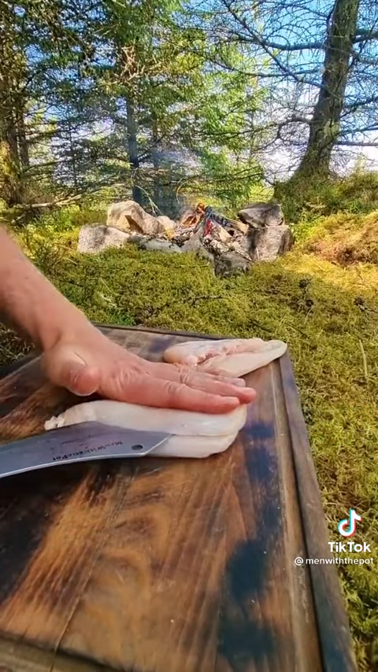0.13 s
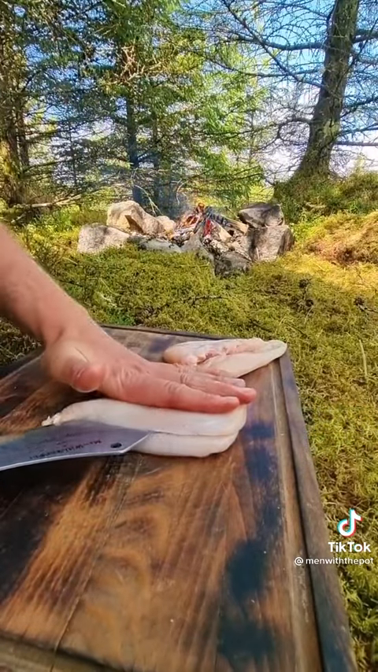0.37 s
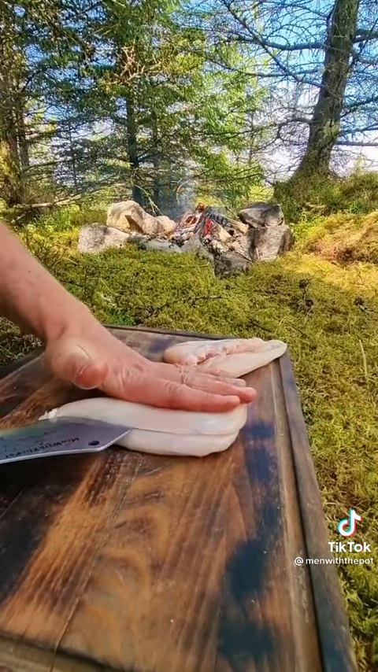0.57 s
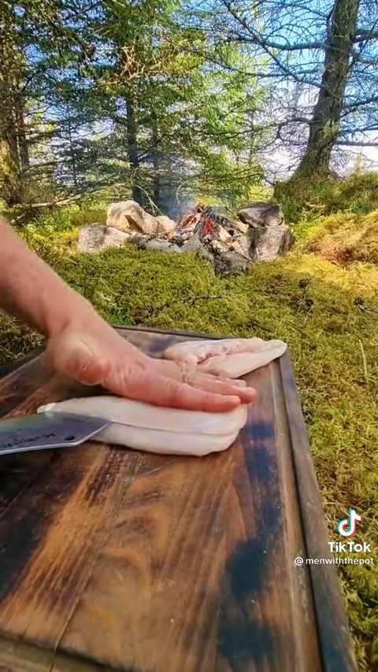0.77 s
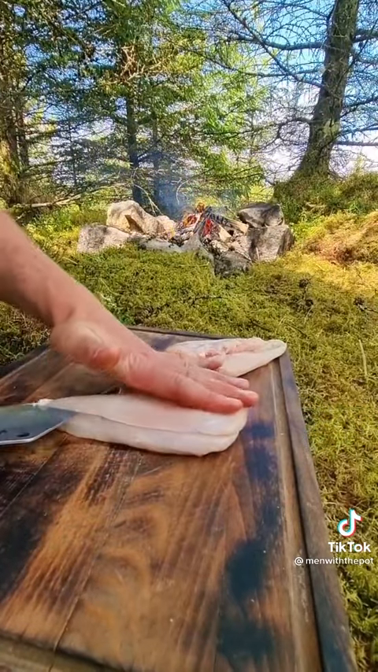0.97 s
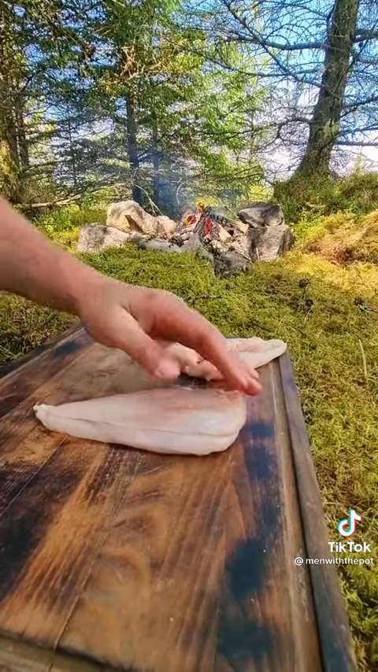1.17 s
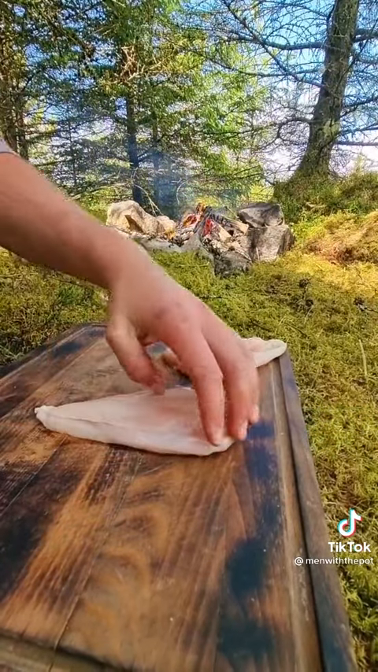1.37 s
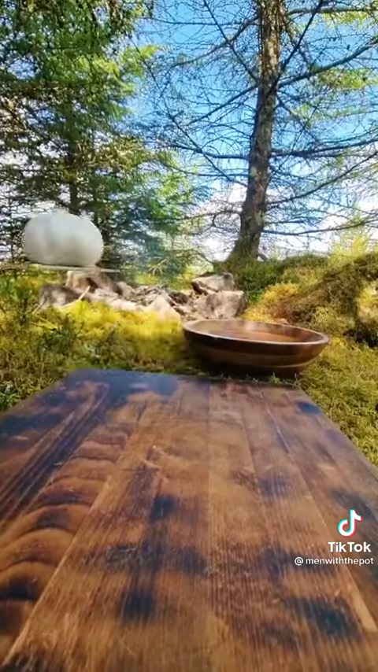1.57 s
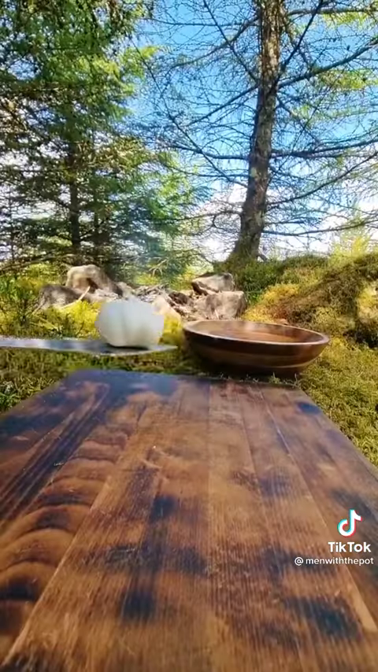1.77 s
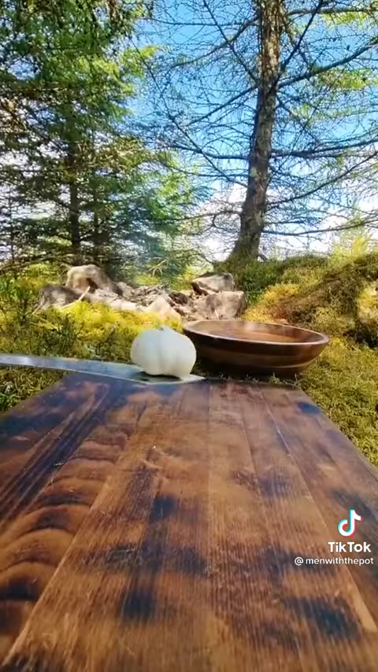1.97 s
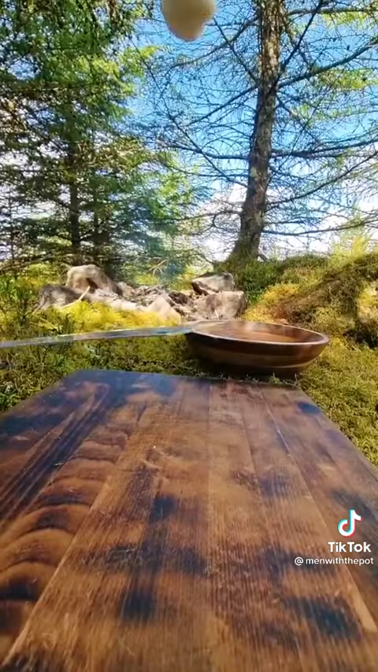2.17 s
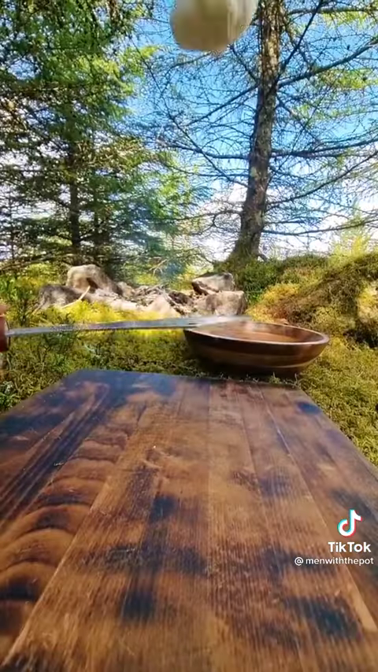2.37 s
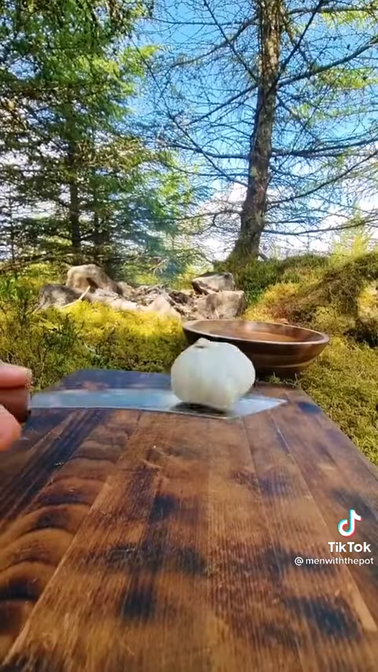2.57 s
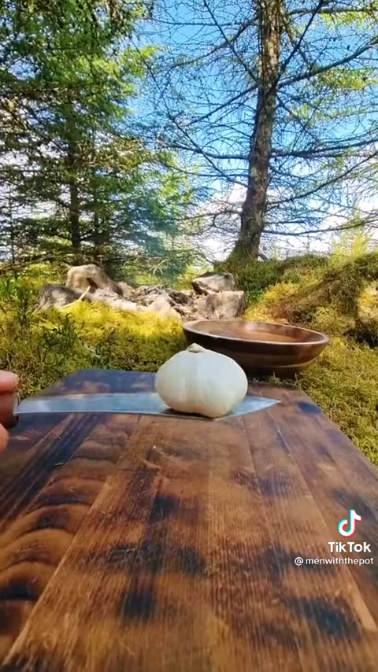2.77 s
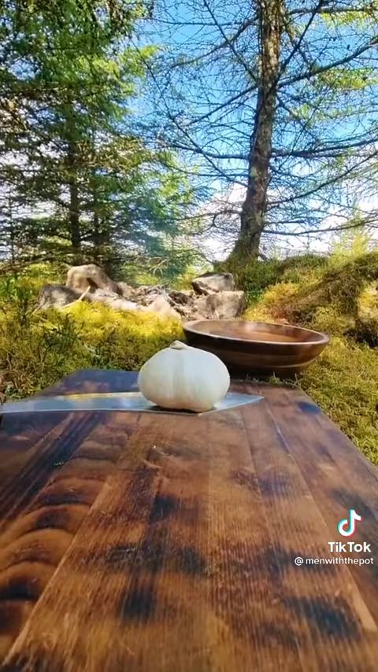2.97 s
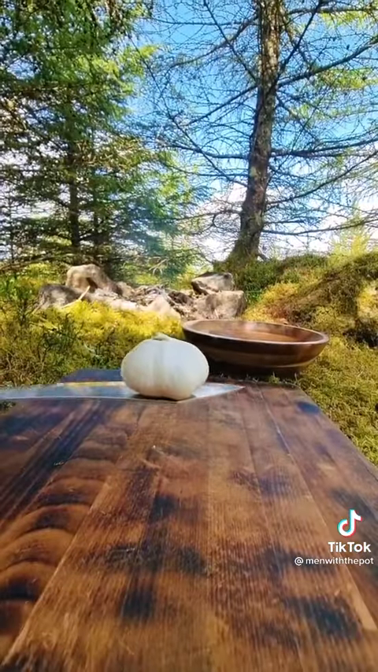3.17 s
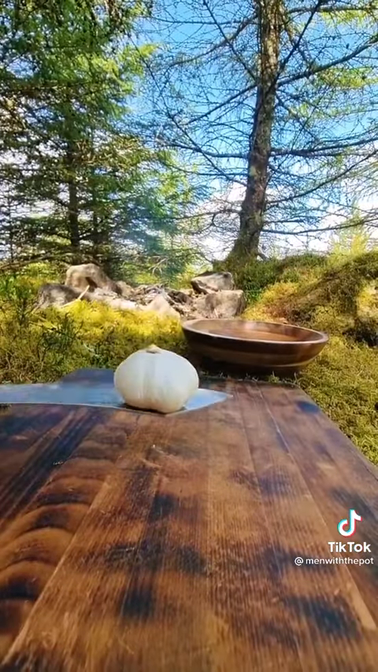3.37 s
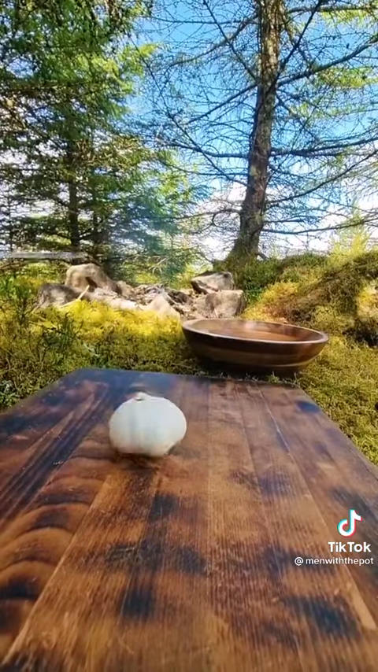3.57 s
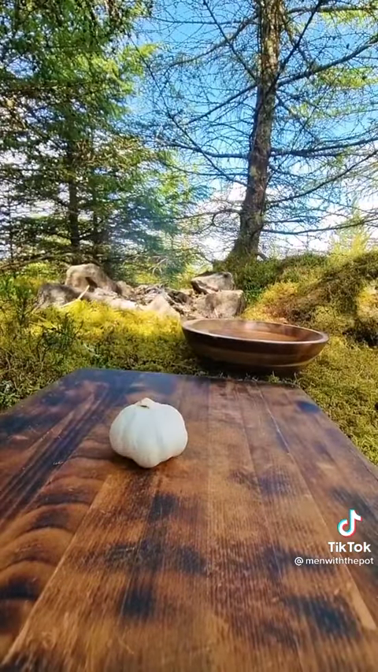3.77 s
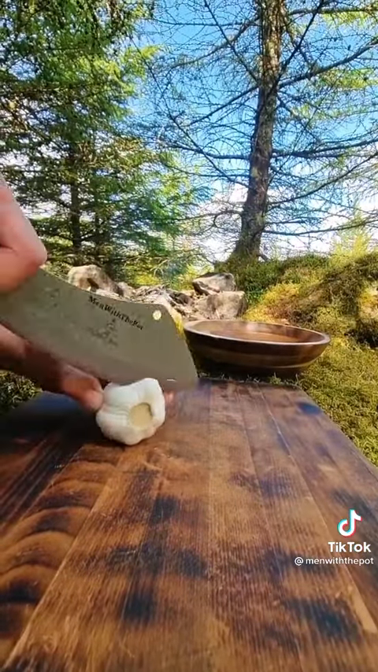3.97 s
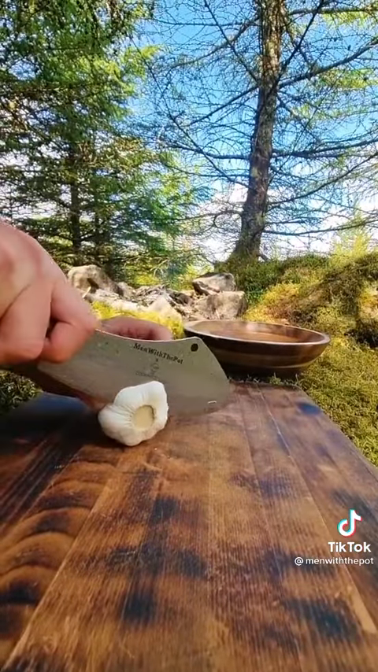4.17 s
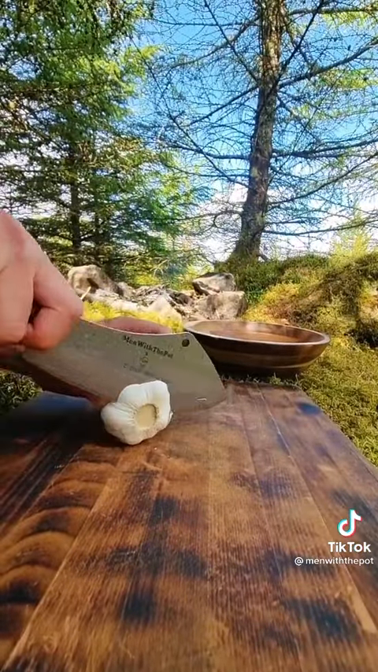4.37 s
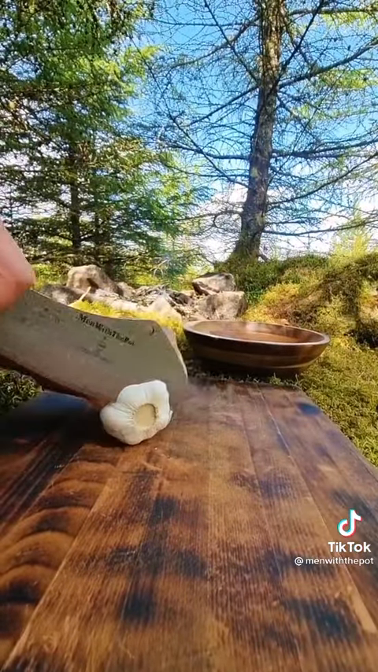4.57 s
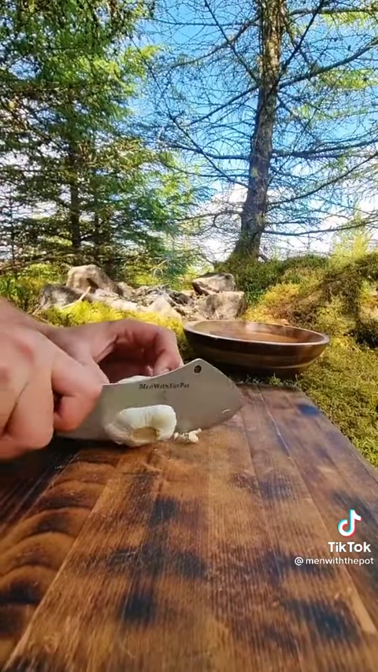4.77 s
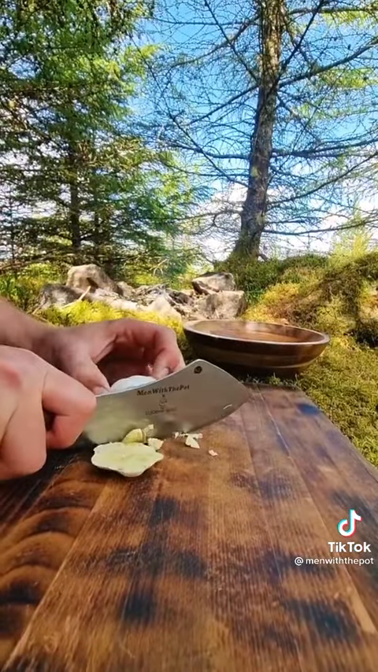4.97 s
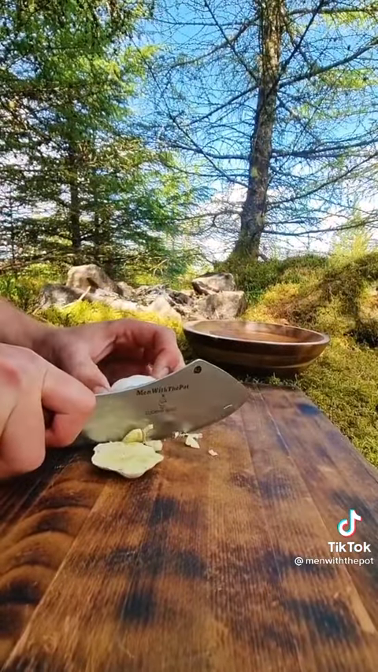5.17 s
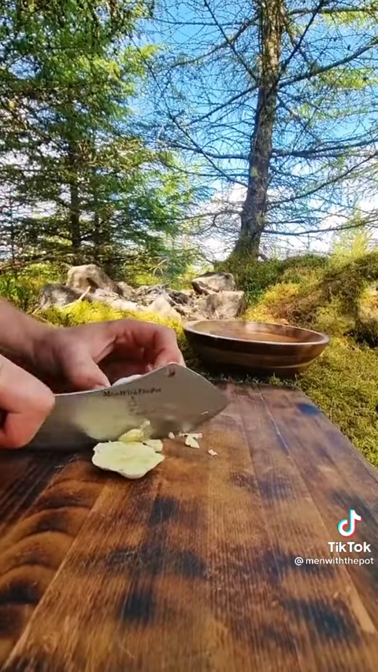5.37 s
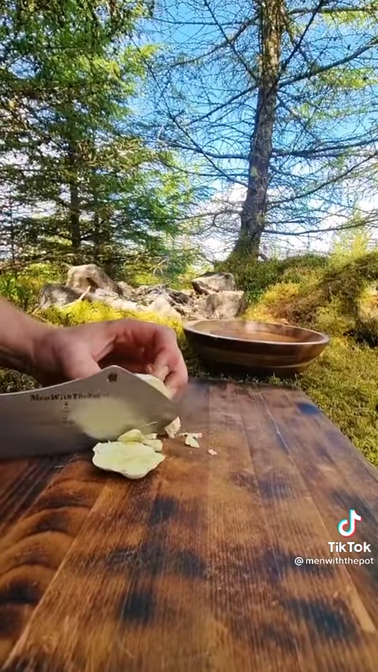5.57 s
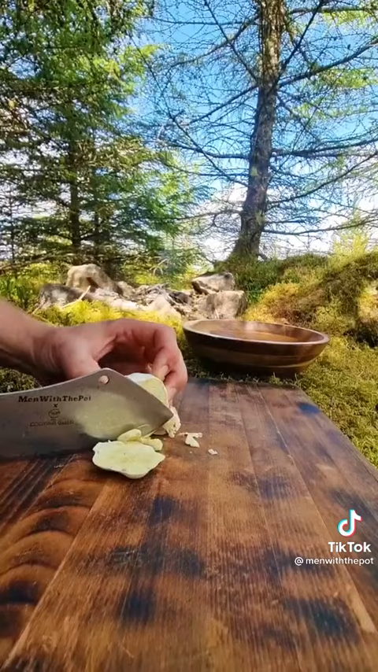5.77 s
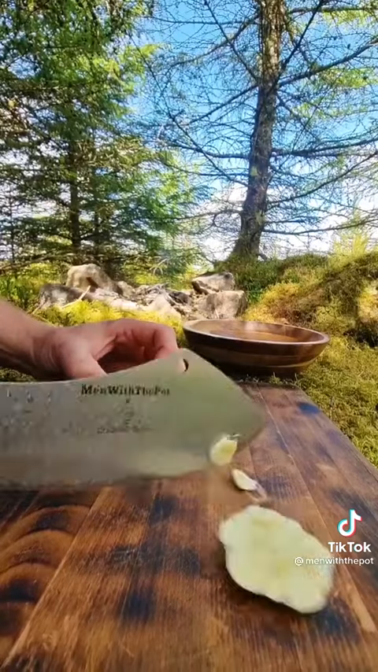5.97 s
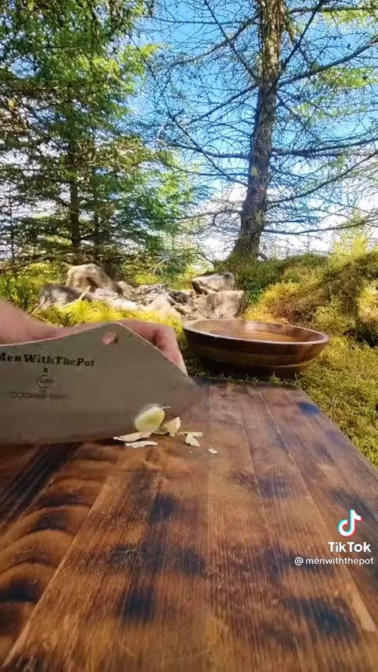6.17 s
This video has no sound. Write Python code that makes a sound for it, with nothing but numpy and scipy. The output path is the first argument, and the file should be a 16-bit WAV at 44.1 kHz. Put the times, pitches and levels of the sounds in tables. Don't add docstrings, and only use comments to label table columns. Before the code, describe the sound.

Outdoors among trees, microphones close to a thick wooden board. Soft wind and tiny ember ticks open, with a few faint bird chirps. A garlic bulb lands on a steel blade with a sudden papery thud, bounces lightly, then drops on the board with two short woody knocks. Skin crackles under sawing, a loud crunch and chop bursts it, flakes crackle, and the wet blade slides with thin squeaks before a final rough scrape.

```python
import sys
import numpy as np
from scipy import signal
from scipy.fft import rfft, irfft, next_fast_len
from scipy.io import wavfile
from scipy.ndimage import uniform_filter1d, map_coordinates

SR = 44100
rng = np.random.default_rng(int(sys.argv[2]) if len(sys.argv) > 2 else 0)


def pcm_store(signal):
    levels = np.round(np.clip(np.atleast_2d(signal), -1, 1) * 32767)
    wavfile.write(sys.argv[1], SR, levels.astype(np.int16).T)


def volts_from_decibels(level):
    exponent = np.asarray(level, float) / 20
    return 10 ** exponent


N = 274743
T = np.arange(N) / SR


def unit(x):
    return x / np.sqrt(np.mean(x ** 2) + 1e-20)


def along(points, hz):
    f, *columns = np.transpose(points)
    return np.squeeze([np.interp(np.log(hz + 1), np.log(f + 1), column) for column in columns])


def wobble(rate):
    knots = rng.standard_normal(int(N * rate / SR) + 4)
    return map_coordinates(knots, [T * rate])


def noise_pair():
    return rng.standard_normal((2, N))


def stroke(s, rise, hold, fall, db):
    before = np.clip(s - T, 0, None)
    after = np.clip(T - s - hold, 0, None)
    return volts_from_decibels(db - 42.0 * (before / rise + after / fall))


def strokes(rows):
    return sum(stroke(*row) for row in rows)


def add(track, s, sound):
    part = track[..., round(s * SR):][..., :sound.shape[-1]]
    part += sound[..., :part.shape[-1]]


def ring(modes, seconds, free=1, pitch=1, contact=0.00084):
    t = np.arange(int(seconds * SR)) / SR
    side = np.array([[.5], [-.5]])
    out = 0
    for hz, db, t60, pan_db, lead in modes:
        fading = volts_from_decibels(db + side * pan_db - 60 * t / (free * t60))
        out = out + fading * np.sin(2 * np.pi * pitch * hz * t + side * lead)
    return (1 - np.exp(-t / contact)) * out


def whistle(rows, rough):
    s, hz, db = np.transpose(rows)
    pitch = np.interp(T, s, hz) * (1 + .03 * rough * wobble(200))
    level = volts_from_decibels(np.interp(T, s, db, left=-140, right=-140) + 8 * rough * wobble(120))
    return level * np.sin(2 * np.pi * np.cumsum(pitch) / SR)


# (f/Hz, likeness 0-1, left lead/rad, left-right level/dB)
NEAR = [(130.1, .9, -5, 4), (250, 0.9, -5.5, -3), (546, 0.9, 7.5, -18), (850, 0.8, 6.5, 3),
        (1325, 0.2, -1.56, 14), (2030, .4, -5.5, 0.6), (2957, 0.2, -2.5, 0.5), (6000, 0.1, 1.65, 2.5),
        (9460, 0.5, -5, 3.5), (16300, 0.01, 5, 11)]
# (f/Hz, likeness 0-1, left lead/rad, left-right level/dB)
FAR = [(50, 0.5, .4, -1.5), (130, 0.99, 0.13, -0.5), (239, 0.95, 1.2, -5.5), (537, 0.3, 2.2, -0.5),
       (854, 1, 2.47, 6), (1270, 0.3, 1.9, 1), (3556, 0.5, 4.98, 5), (6050, 1, 4.67, 3),
       (9000, 0.9, 4.85, 0), (14000, 0.4, 3.5, 2.5)]


def ports(pair, gain, where):
    size = next_fast_len(N + 8192)
    hz = np.fft.rfftfreq(size, 1 / SR)
    alike, lead, pan_db = along(where, hz)
    turn = np.arccos(np.clip(alike, 0, 1)) / 2
    colour = gain(hz) / np.sqrt(np.mean(gain(hz) ** 2))
    a, b = rfft(pair, size) * colour * [np.cos(turn), np.sin(turn)]
    tilt = volts_from_decibels(pan_db / 2) * np.exp(.5j * lead)
    return irfft(np.array([(a + b) * tilt, (a - b) / tilt]), size)[:, :N]


# (t/s, peak level/dB, crispness/dB, ring f/Hz)
EMBERS = [(.06, -49.5, 11, 8000), (.1503, -34.5, 8, 6800), (.1655, -49, 5, 4600), (.28, -57, 11, 9000),
          (.454, -52, 3, 4800), (.4752, -57, 8, 8200), (.5443, -54, -3, 3000), (.554, -50, 10, 5500),
          (.642, -51, 8.5, 5000), (.8197, -43.5, 4, 3700), (.8453, -52, -1, 4050), (1.291, -54, -7, 4100),
          (1.486, -54, 8, 5600), (2.075, -60, 7, 7050), (2.0836, -60.5, 15, 7000), (2.13, -59.5, 3, 6400),
          (2.189, -62, -7, 5000)]
PEEL = [(2.5535, -13.5, 6, 7600), (2.5805, -31, -9, 6000), (2.6138, -40, -11, 4500), (2.6365, -55, 8, 7000),
        (2.656, -50, 12.5, 9500), (2.7538, -56, 4, 5500), (2.8165, -54, 1, 5400), (2.8266, -55.5, -6, 5200),
        (2.8494, -63, 4, 7000), (2.9502, -63.5, -3.5, 7200), (3.421, -56, 14, 7600),
        (3.4885, -43.5, -6, 2800), (3.492, -36, -4, 3100), (3.4962, -40, -6, 5200),
        (3.5395, -25.5, -8, 7140), (3.6128, -33, -15, 2980), (3.65, -40.5, -5, 3080),
        (3.6572, -48, 3, 3500), (3.697, -47, -1, 3150), (3.8385, -52, 11, 7640)]
SPLITS = [(3.9968, -47, 6, 3000), (4.012, -44.5, 7, 6900), (4.017, -44.5, 4, 7300), (4.0625, -25, 1, 7250),
          (4.095, -30, 0, 5500), (4.1028, -29, -9, 3270), (4.1312, -37, 5, 7500), (4.172, -30, 2.5, 8500),
          (4.2108, -25.5, 2, 7000), (4.2128, -24, -13, 3050), (4.2188, -25, 7.5, 3300),
          (4.2282, -19.5, 2.5, 6200), (4.234, -30, 1.5, 7000), (4.2447, -19.5, 5, 6600),
          (4.2478, -19.5, 5, 7100), (4.2515, -21.5, 0, 4000), (4.264, -37, 0.5, 8000),
          (4.2816, -27.5, -4.5, 7400), (4.2868, -37, 2, 7200), (4.306, -46, -5, 2700),
          (4.376, -56.5, -12.5, 3000), (4.467, -33.5, -5, 3300), (4.622, -53, -9, 2497),
          (4.6418, -48, -4, 3000), (4.6718, -24, -2.5, 2490), (4.685, -22, -3.5, 7160),
          (4.696, -21, -3, 3500), (4.705, -14, 2, 3950), (4.7115, -14, -5.5, 2920),
          (4.7195, -11, 1.5, 7470), (4.7233, -5.5, -3, 3300), (4.727, -9, -3.5, 8000),
          (4.735, -14.5, -4, 2820), (4.7415, -17, -5.5, 2920), (4.745, -8.5, -4.5, 5000)]
FLAKES = [(4.8245, -22, -4, 8100), (4.8405, -20.5, 0, 7150), (4.8498, -34, -2, 3297),
          (4.8628, -29, 3, 7520), (4.8993, -47, 11, 7300), (4.9075, -44, 9, 7000), (4.9235, -38.5, 5, 7500),
          (4.9332, -38, 7, 7740), (4.942, -31, 8, 6950), (4.968, -31, 5.5, 2900), (4.977, -35.5, 2, 3420),
          (4.989, -42, 0.5, 7470), (4.997, -42, -7, 3400), (5.0317, -53.5, 4, 6280), (5.049, -39, 8, 7000),
          (5.0583, -37.5, -1.5, 2854), (5.1798, -46, 4.5, 6660), (5.214, -55, -0.5, 8480),
          (5.267, -51, -4.5, 3000), (5.28, -53, -7.5, 3050)]
SWEPT = [(5.318, -41, 10, 7000), (5.3468, -18.5, 0.5, 5830), (5.4875, -25, 4, 8500), (5.5025, -38, 7, 8500),
         (5.8438, -49, 0, 3220), (5.8576, -52, -7.5, 3380), (5.9457, -27.5, -8, 3930),
         (5.969, -23, -10, 2470), (5.9745, -17, -4, 6630), (5.979, -20.5, -12, 3420),
         (5.9845, -23, 11.5, 7600), (6.0235, -44, 10, 8000), (6.0275, -38, 10, 9000),
         (6.0295, -33.5, 12.5, 7600), (6.0475, -48, 0, 8600), (6.0584, -36, 12, 6000),
         (6.0647, -47, 16, 6200), (6.0761, -38, -2, 8200), (6.1015, -35, 10, 6540), (6.1165, -39, 3, 8000)]


def cracks():
    # (cracks, dull part level/dB, bright part level/dB) at crispness 0
    families = [(EMBERS, -20, -13.5), (PEEL, -0.95, -17), (SPLITS, -8.5, -7.5), (FLAKES, -3.5, -5.5),
                (SWEPT, -2.5, -10.5)]
    dulls, brightens = 0.47, 1.55
    flake_q, flake_db = 4, 6
    spiky = .6
    parts = np.zeros((3, 2, N))
    t = np.arange(SR // 20) / SR
    shape = (1 - np.exp(-t / 0.00073)) * (volts_from_decibels(-60 * t / 0.0063) + volts_from_decibels(-11.5 - 60 * t / 0.024))
    for rows, dull_db, bright_db in families:
        for s, db, crisp_db, flake_hz in rows:
            fibres = rng.standard_normal((2, len(t)))
            tear = fibres * np.abs(fibres) ** spiky * shape
            b, a = signal.iirpeak(flake_hz, flake_q, SR)
            rung = tear + volts_from_decibels(flake_db) * signal.lfilter(b, a, tear)
            even = np.linalg.norm(shape) / np.linalg.norm(rung, axis=1, keepdims=True)
            burst = volts_from_decibels(db - 4.0) * rung * even
            shares = volts_from_decibels([dull_db - dulls * crisp_db, 0, bright_db + brightens * crisp_db])
            add(parts, s, shares[:, None, None] * burst)
    return parts


# (t/s, rise/s, hold/s, fall/s, level/dB)
RUSTLES = [(2.551, 0.044, 0.002, 0.009, -55.5), (2.557, 0.009, 0.006, 0.14, -47),
           (2.66, .1, 0.022, 0.58, -71.5), (3.505, 0.27, 0.0056, 0.04, -65), (3.555, .01, 0.02, .015, -67),
           (3.64, 0.022, 0.021, 0.015, -64), (3.694, .01, 0.008, .02, -61), (3.712, .01, .008, 0.033, -69),
           (3.76, 0.12, 0.096, 0.077, -72.5), (4.3, .05, 0.054, .05, -76), (4.88, .03, 0.096, 0.21, -57),
           (6.03, 0.044, 0.081, 0.085, -68), (5.19, 0.036, 0.01, 0.078, -82), (5.8, 0.24, 0.21, 0.028, -81),
           (6.172, 0.065, 0.024, 0.094, -56)]
SAWING = [
    (4.066, 0.13, 0.149, 0.057, -48),
    (4.213, 0.019, 0.045, 0.089, -41),
    (4.762, 0.033, 0.095, 0.038, -41),
    (4.642, .004, .025, .02, -56),
]
CRUNCH = [
    (4.674, 0.018, 0.016, 0.057, -38),
    (4.698, 0.042, 0.057, 0.022, -28),
]
SLIDES = [
    (5.36, 0.15, 0.0064, 0.19, -46),
    (5.46, 0.226, 0.042, 0.33, -49.5),
    (5.58, 0.28, 0.012, 0.22, -58),
]
DRAW_BACK = [
    (4.378, .025, 0.16, 0.16, -51.5),
]
SWEEP = [
    (5.9455, 0.0032, .006, 0.046, -51),
    (5.97, 0.033, 0.01, 0.054, -31),
]


def rubbing():
    # (strokes, dull part, bright part, board shaking, deep shaking), levels/dB
    families = [(RUSTLES, -15, -5, -12, -25.5), (SAWING, -3, -3.4, -7, -10.5), (CRUNCH, -5, -8, -1.6, -7.5),
                (SLIDES, -7.5, -10, -6, -30), (DRAW_BACK, -5.5, -10, -18.5, -23), (SWEEP, -0.5, -4.5, 0, -25)]
    gains = 0
    for rows, dull_db, bright_db, shake_db, deep_db in families:
        gains = gains + volts_from_decibels([dull_db, 0, bright_db, shake_db, deep_db])[:, None] * strokes(rows)
    z = signal.stft(noise_pair(), nperseg=256)[2]
    field = rng.standard_normal(z.shape[1:])
    field = uniform_filter1d(uniform_filter1d(field, size=4, axis=0), size=7, axis=1)
    rustle = signal.istft(z * volts_from_decibels(3.3 * unit(field)), nperseg=256)[1][:, :N]
    clicks = (rng.random(N) < 700 / SR) * volts_from_decibels(4.5 * rng.exponential(size=N).clip(0, 2.4))
    fibres = signal.lfilter([1], [1, -np.exp(-1 / (0.00098 * SR))], clicks)
    grains = rustle * volts_from_decibels(1.1 * wobble(45)) * (1 + .36 * fibres)
    grains /= np.sqrt(uniform_filter1d(np.mean(grains ** 2, axis=0), size=SR // 16))
    return gains[:3, None] * grains, volts_from_decibels(-19.5) * gains[3:] * grains[0]


# (f/Hz, level/dB per Hz)
SKIN = [(440, -44.5), (750, -11.5), (1050, 0), (1760, -8), (2870, -1.5), (3720, -4.5), (4750, -5),
        (5270, -6), (7660, -6), (11100, -21.5), (14400, -17.5), (15800, -18.5), (16400, -47.5)]


def skin_colour(parts):
    def below(hz, edge_hz):
        return 1 / (1 + (hz / edge_hz) ** 8)

    shares = [lambda hz: below(hz, 2600),
              lambda hz: below(hz, 13000) - below(hz, 2300),
              lambda hz: 1 - below(hz, 9500)]
    return sum(ports(part, lambda hz: volts_from_decibels(along(SKIN, hz)) * share(hz), NEAR)
               for part, share in zip(parts, shares))


# (f/Hz, level/dB, time to fade by 60 dB/s, left-right level/dB, left lead/rad)
BOARD_LOW = [(111, 1.5, 0.033, -9, -3), (259, 2, 0.076, 8.5, -2.5), (196, -6.5, 0.11, -8, 3.5)]
BOARD_MID = [(420, -7, 0.097, -6.5, -1.2)]
BOARD_HIGH = [(542.8, 3, 0.11, -7, -1.49), (298, -20.5, 0.0027, 5, -2), (619, -8.5, 0.07, -5.5, -2.5),
              (465, -9, 0.035, 11.5, -3)]
# (t/s, peak level/dB, low notes level/dB, middle note level/dB)
KNOCKS = [(3.533, -42, -5, -3), (3.5393, -17.5, -1.5, 2), (3.607, -40.5, -11, -3), (3.6129, -16, -6, -6),
          (3.654, -43.5, 6.5, -4), (3.698, -46, 4, -6), (3.719, -52, 9, 0), (3.748, -49.5, 10, 2),
          (3.769, -55.5, 8, 0), (3.801, -44, 0, -2), (3.849, -72, 23.5, 9), (4.064, -35, -8.5, -14),
          (4.211, -38.5, -1.5, -7), (4.255, -38, -7, -11), (4.672, -33.5, 0, -5), (4.696, -24, -14, -8),
          (4.705, -24, -8, -12), (4.725, -28, -8, -10), (4.7552, -6.5, -17.5, -13), (4.825, -46, -30, -12),
          (4.841, -30, -32, -16), (4.886, -52.5, -31, -14), (4.994, -39.5, -13.5, -5.5),
          (5.347, -32.5, -46, -22), (5.395, -38, -44, -15), (5.955, -39, -28, -6.5),
          (5.974, -20.5, -34, -2), (6.05, -36.5, -11, -3), (6.078, -31, -22, -7), (6.103, -35.5, -21, -6),
          (6.118, -26, -23, 2.5)]
# (from t/s, share of the free ring time, pitch factor, contact time/s)
LOAD = [
    (0, .9, 1, .0015),
    (3.95, .85, 1, .0011),
    (4.63, .56, .975, .0008),
    (4.8, .62, 1, .0011),
]


def board(shaking):
    drive = np.array([shaking[0], shaking[1], volts_from_decibels(-15) * shaking[0]])
    for s, db, low_db, mid_db in KNOCKS:
        drive[:, round(s * SR)] += volts_from_decibels(db + np.array([1, low_db + 6.0, mid_db]))
    out = np.zeros((2, N))
    ends = [row[0] for row in LOAD[1:]] + [N / SR]
    for (s, free, pitch, contact), end in zip(LOAD, ends):
        span = drive[:, round(s * SR):round(end * SR)]
        for x, modes in zip(span, (BOARD_HIGH, BOARD_LOW, BOARD_MID)):
            answer = ring(modes, .25, free, pitch, contact)
            add(out, s, signal.oaconvolve(x[None], answer, axes=1))
    return out


# (f/Hz, level/dB, time to fade by 60 dB/s)
STEEL = [(2815, -9, .1), (3397, 0, .24), (4830, -11, .19), (6051, -3, .07), (7267, -8, .08),
         (7700, -3, .03)]
# (t/s, thud level/dB, thud f/Hz, clearest ring level/dB, other rings level/dB)
BULB = [(2.085, -75, 910, -82, -69), (2.5528, -14, 1060, -57.5, -37), (2.5532, -24.5, 1970, -78, -80),
        (2.5545, -25.5, 168, -80, -80), (2.5804, -28.5, 890, -61, -66), (2.6136, -23.5, 836, -44, -64),
        (2.636, -38.5, 850, -77, -80), (2.757, -44, 1020, -80, -73), (2.826, -41.5, 860, -87.5, -70),
        (3.488, -48, 1110, -46.5, -62), (3.497, -70, 1120, -42.5, -53), (3.54, -29.5, 1394, -66, -62),
        (4.166, -38.5, 1620, -55, -78), (4.344, -42, 1160, -77, -82), (4.349, -42, 990, -80, -80),
        (4.841, -27, 1200, -80, -70), (4.755, -22, 1304, -80, -80), (4.7555, -15, 800, -80, -80),
        (5.3465, -29.5, 910, -80, -63), (5.3475, -30, 705, -80, -80), (5.395, -37, 656, -80, -80),
        (5.487, -36, 2400, -80, -80), (5.947, -38, 1290, -77, -80), (5.97, -20, 1200, -32, -44),
        (5.972, -29, 271, -80, -80), (6.03, -47, 1400, -77, -75), (6.048, -32.5, 850, -73.5, -70),
        (6.077, -31.5, 990, -72.5, -75.5), (6.079, -43.5, 1446, -73, -75), (3.6125, -34, 1230, -80, -80),
        (6.117, -30, 885, -73, -70)]


def blade():
    pressed_s = 3.45
    stilled_s = 3.536
    out = np.zeros((2, N))
    for s, thud_db, thud_hz, clear_db, other_db in BULB:
        free = .92 if s < pressed_s else 0.53
        chance = rng.standard_normal((len(STEEL), 2))
        lingers = 1300 < thud_hz < 1700 or 200 < thud_hz < 400
        modes = [(thud_hz, thud_db, .05 if lingers else .014, 6, .4),
                 (thud_hz / 3.1, thud_db - 12.5, .03, -7, 1.2)]
        for k, (hz, db, t60) in enumerate(STEEL):
            struck_db = clear_db if k == 1 else other_db + 2 * chance[k, 0]
            modes.append((hz, db + struck_db, free * t60, 3, .4 * chance[k, 1]))
        seconds = stilled_s - s if pressed_s < s < stilled_s else .45
        add(out, s, ring(modes, seconds))
    return out


# (f/Hz, width/Hz, level/dB)
SCRAPED = [(685, 130, 0.5), (1200, 130, -1), (1650, 110, -3), (2400, 130, 0), (3410, 110, -4),
           (4840, 240, -2), (6700, 300, -6), (7600, 300, -6)]


def scrape():
    def steel(hz):
        return sum(volts_from_decibels(db) / np.sqrt(1 + ((hz - mode_hz) / (width / 2)) ** 4) for mode_hz, width, db in SCRAPED)

    shaken = strokes(SWEEP[1:]) * noise_pair() * volts_from_decibels(1.5)
    return ports(shaken, steel, NEAR)


# (t/s, f/Hz, level/dB)
SQUEAKS = [
    [(5.365, 3050, -58), (5.39, 2780, -52), (5.43, 3400, -53), (5.45, 3600, -56), (5.475, 3800, -56),
     (5.5, 4000, -55), (5.53, 4050, -52), (5.545, 4050, -66)],
    [(5.46, 1900, -68), (5.5, 1950, -59), (5.54, 1950, -68)],
    [(4.4, 2400, -70), (4.435, 2280, -61), (4.47, 2450, -63), (4.5, 2550, -61), (4.535, 2280, -63),
     (4.56, 2200, -72)],
]
# (multiple, level/dB)
OVERTONES = [(1, 0), (2, -3), (3, -2)]
# (t/s, level/dB)
JUDDER = [(5.48, -59), (5.53, -57), (5.65, -55.5), (5.739, -79), (6.0, -95), (6.04, -61.5), (6.149, -59.5),
          (6.22, -78)]


def squeaks():
    s, db = np.transpose(JUDDER)
    slips = volts_from_decibels(np.interp(T, s, db, left=-140) + 1.5 * wobble(60)) * noise_pair()
    judder = ports(slips, lambda hz: 1 / (1 + ((hz - 1380) / 130) ** 2), NEAR)
    glides = list(SQUEAKS[:-1])
    for multiple, db in OVERTONES:
        glides.append(np.multiply(SQUEAKS[-1], [1, multiple, 1]) + [0, 0, db])
    return sum(whistle(glide, rough=0.31) for glide in glides) * volts_from_decibels([[1.5], [-1.5]]) + judder


# (t/s, level/dB)
CHIRPS = [
    (1.135, -78),
    (1.265, -80),
    (1.395, -76),
    (1.525, -72),
    (1.67, -76),
]
# (t/s, f/Hz)
CHIRP = [(0, 4900), (.012, 4740), (.024, 4900), (.036, 5400)]


def bird():
    t, hz = np.transpose(CHIRP)
    swell_db = np.array([-6, -1, 0, -2])
    calls = sum(whistle(np.transpose([s + t, hz, db + swell_db]), rough=.4) for s, db in CHIRPS)
    return calls * volts_from_decibels([[1.5], [-1.5]])


# (f/Hz, level/dB per Hz)
RUMBLE = [(12, -47), (20, -27), (48, -3), (76, 0), (130, -6), (189, -10.5), (242, -21.5), (400, -17.5),
          (520, -63.5), (880, -120)]
# trees, up to the drop at 1.73 s
TREES = [(120, 5), (200, -8), (436, -8), (537, -0.5), (630, -7), (787, 2.5), (1000, -0.5), (1500, 1.5),
         (1950, -1), (2500, -3), (2850, -11), (9000, -27), (11700, -39), (19800, -120)]
TREES_LATER = [(120, -29.5), (200, -7), (338, -9), (496, -6.5), (610, -7), (715, -2.5), (1460, -6.5), (2560, -15),
               (3570, -27), (9000, -34.5), (11700, -67), (19800, -120)]
HISS = [(2940, -23), (5000, -17.5), (7530, -8.5), (8580, -16.5), (11100, -11), (14900, -4.5), (15700, -32),
        (16500, -28)]
BUFFET = [(25, -40), (55, -1), (85, -1.5), (125, -22), (200, -50), (400, -120)]
# (t/s, rise/s, hold/s, fall/s, level/dB)
BUFFETS = [
    (0.897, .4, 0.051, 0.15, -55.5),
    (1.098, 0.13, 0.074, 0.21, -53),
    (1.31, 0.25, .02, 0.14, -57.5),
    (1.484, 0.16, 0.018, 0.16, -54.5),
    (6.21, 0.073, .03, 0.093, -58.5),
]
# (t/s, level/dB)
WIND = [(0, 1), (.7, 5.5), (.95, 3.5), (1.15, 0.5), (1.72, 1), (2.4, 0.5), (2.7, 1), (3.1, -0.5), (4.2, 3),
        (4.9, 0.5), (5.15, -4.5), (5.5, -4), (5.9, -3), (6.23, 2.5)]
# (t/s, rise/s, hold/s, fall/s, level/dB)
FLARE = (1.045, .25, .02, .12, -66)


def outdoors():
    drop_s, hiss_dies_s = 1.73, 0.086
    rumble_db, trees_db, hiss_db = (-67.5, -67), (-56.5, -62.5), (-79, -87.5)

    def noise(spectrum):
        return ports(noise_pair(), lambda hz: volts_from_decibels(along(spectrum, hz)), FAR)

    wind_db = np.interp(T, *np.transpose(WIND))
    later = np.clip((T - drop_s) / 0.045 + .5, 0, 1)
    earlier = np.sqrt(1 - later) * volts_from_decibels(trees_db[0]) * noise(TREES)
    trees = earlier + np.sqrt(later) * volts_from_decibels(trees_db[1]) * noise(TREES_LATER)
    trees = volts_from_decibels(0.3 * wind_db + 0.22 * wobble(9.0)) * trees
    gusts_db = wind_db + 2.5 * wobble(6.4)
    rumble = volts_from_decibels(np.interp(later, [0, 1], rumble_db) + gusts_db) * noise(RUMBLE)
    buffets = strokes(BUFFETS) * noise(BUFFET)
    gone = 1 - np.exp(-np.clip(T - drop_s, 0, None) / hiss_dies_s)
    hiss_level = volts_from_decibels(np.interp(gone, [0, 1], hiss_db)) + stroke(*FLARE)
    hiss = hiss_level * volts_from_decibels(1.5 * wobble(6.9)) * noise(HISS)
    return rumble + buffets + trees + hiss


def scene():
    rustle, shaking = rubbing()
    no_bass = signal.butter(2, 55, "high", fs=SR, output="sos")
    slab = signal.sosfilt(no_bass, board(shaking) + blade())
    skin = skin_colour(cracks() + rustle)
    return skin + slab + scrape() + squeaks() + bird() + outdoors()


def roll_off(x):
    return signal.sosfilt(signal.butter(12, 16670, fs=SR, output="sos"), x)


def record(dry):
    soft = dry / (1 + np.abs(dry / 1.3) ** 6) ** (1 / 6)
    hz = np.fft.rfftfreq(N, 1 / SR)
    mix = irfft(rfft(soft) / (1 + (hz / 16000) ** 60), N)
    return roll_off(mix)


dry = scene()
out = record(dry)
pcm_store(out)
```